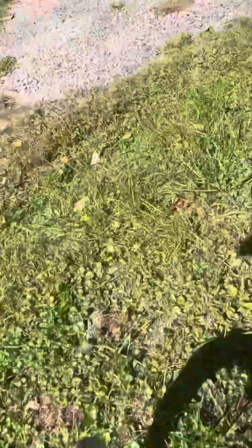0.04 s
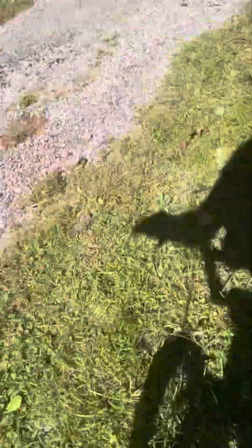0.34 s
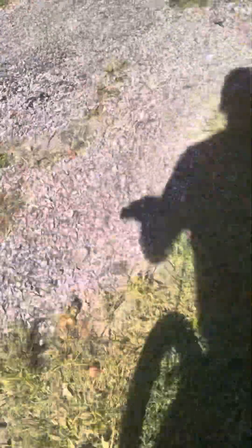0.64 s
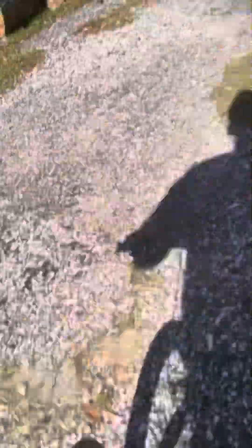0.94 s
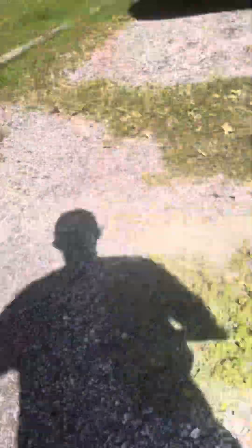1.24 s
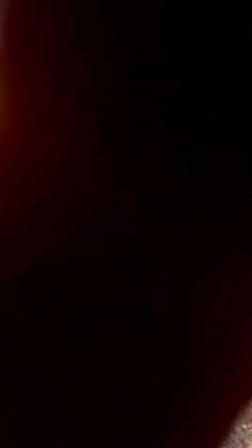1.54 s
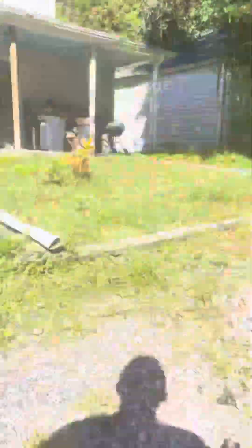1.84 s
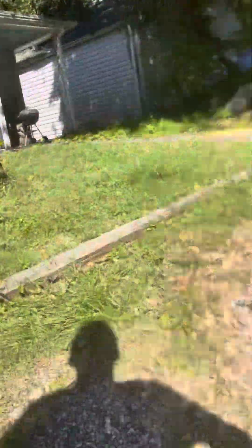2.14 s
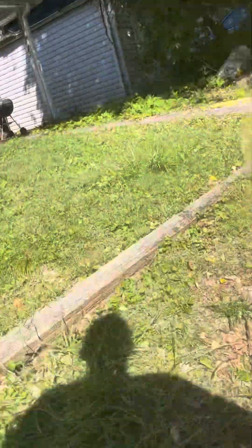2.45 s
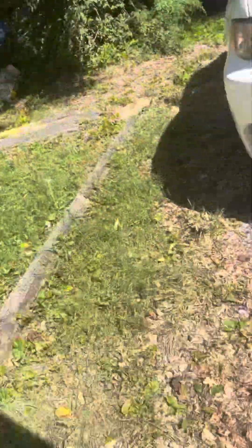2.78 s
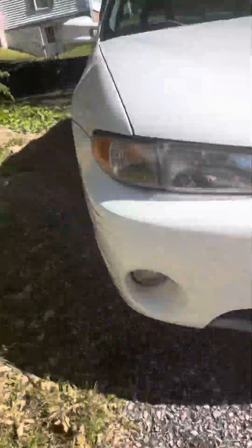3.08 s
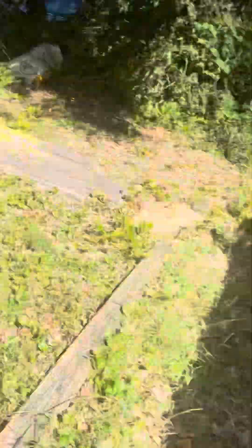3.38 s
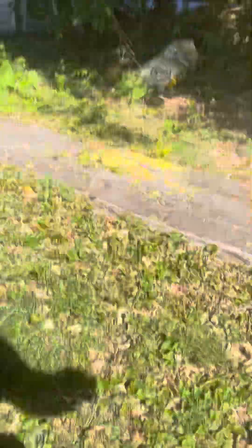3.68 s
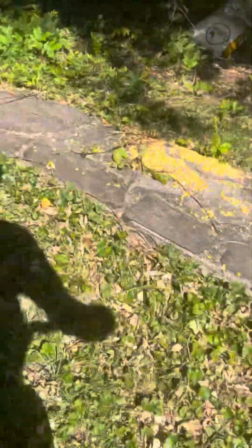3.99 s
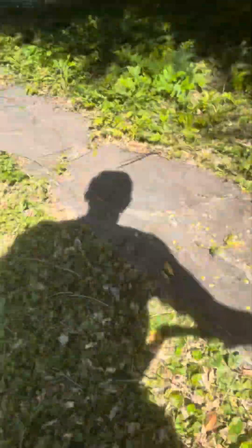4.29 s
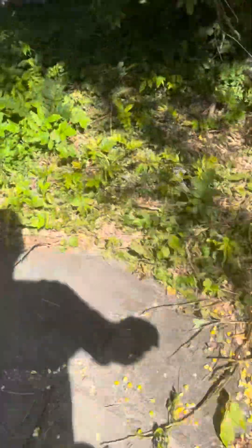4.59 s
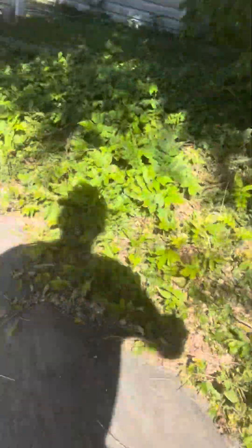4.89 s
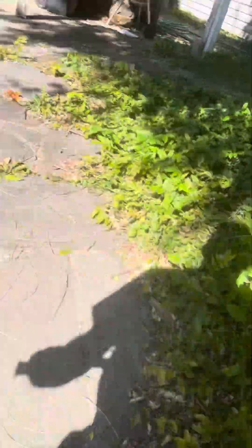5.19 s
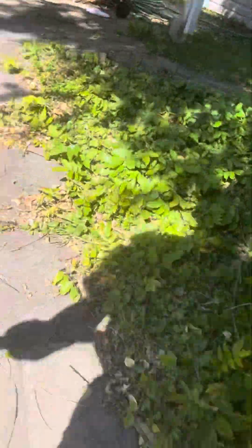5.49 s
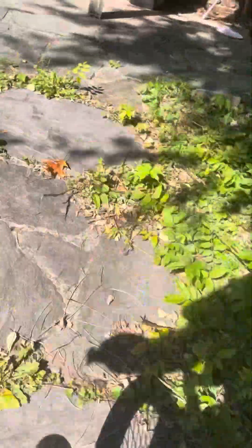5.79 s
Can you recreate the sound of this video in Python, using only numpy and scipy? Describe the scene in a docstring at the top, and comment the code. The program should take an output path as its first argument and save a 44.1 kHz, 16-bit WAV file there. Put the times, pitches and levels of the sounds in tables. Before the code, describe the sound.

A bicycle rolls over bumpy grass and gravel, rattling and knocking over low tyre rumble, with fingers rubbing near the microphone.

```python
"""On bumpy grass, gravel and dry leaves: a rolling bicycle, heard from a phone in the rider's hand.
The ground rustles under the wheels and the tyres rumble and thump. Fingers slip and tick near
the two microphone ports. Every jolt rattles loose parts, rings the frame and knocks the phone
in the grip; the case flexes and moves the left and right ports in opposite phase."""
import sys
import numpy as np
from scipy import signal
from scipy.fft import rfft, irfft, next_fast_len
from scipy.io import wavfile
from scipy.ndimage import uniform_filter1d

SR = 44100
rng = np.random.default_rng(int(sys.argv[2]) if len(sys.argv) > 2 else 0)


def store_pcm(level_fs):
    """Save levels as 16-bit WAV."""
    pcm = np.round(np.clip(level_fs, -1, 1) * 32767).astype(np.int16)
    wavfile.write(sys.argv[1], SR, np.atleast_2d(pcm).T)


N = 257095
T = np.arange(N) / SR


def undb(db):
    """Decibels to gain."""
    return 10 ** (np.asarray(db) / 20)


def unit(x):
    """Scale to rms 1."""
    return x / np.sqrt(np.mean(x ** 2))


def curves(table):
    """Table columns, interpolated linearly over time."""
    times, *columns = np.transpose(table)
    return [np.interp(T, times, column) for column in columns]


def add(track, start_s, sound):
    """Mix a sound into a track."""
    i = int(start_s * SR)
    part = sound[..., max(-i, 0):max(N - i, 0)]
    track[..., max(i, 0):max(i, 0) + part.shape[-1]] += part


def through(x, response):
    """Filter by a function of frequency."""
    size = next_fast_len(N + 4096)
    hz = np.arange(size // 2 + 1) * SR / size
    return irfft(rfft(x, size) * response(hz), size)[..., :N]


def gain_at(f, spectrum):
    """Gain of (Hz, dB) points, interpolated over log frequency."""
    hz, db = np.transpose(spectrum)
    return undb(np.interp(np.log(f + 1), np.log(hz), db))


def colour(x, spectrum):
    """Shape by a spectrum; white noise keeps its power."""
    return through(x, lambda f: unit(gain_at(f, spectrum)))


def walk(rate_hz):
    """Smooth random drift, rms 1."""
    hold = int(SR / rate_hz)
    steps = np.repeat(rng.standard_normal(N // hold + 1), hold)
    return unit(uniform_filter1d(uniform_filter1d(steps, hold), hold)[:N])


def grains(per_s, spread_db):
    """Three independent streams of tiny impacts, most weak, a few strong."""
    size = undb(spread_db * np.minimum(rng.exponential(size=(3, N)), 5))
    hits = rng.random((3, N)) < per_s / SR
    return unit(hits * size * rng.choice([-1, 1], (3, N)))


def swells(table):
    """Envelope of one Gaussian swell per row."""
    return sum(undb(db) * np.exp(-2 * ((T - mid_s) / length_s) ** 2) for mid_s, length_s, db in table)


def ping(t, hz, cycles):
    """A small hard part rings for a few cycles."""
    return np.sin(2 * np.pi * hz * t) * np.exp(-t * hz / cycles) * (1 - np.exp(-t * hz * 2))


def ring(t, hz, rise_s, sag=0.45):
    """A few cycles swell and die; the pitch sags through hz as the contact relaxes."""
    cycles = hz * (t - sag * t * t / (t + 4 * rise_s) / 2) * (1 + sag / 4)
    envelope = (t / rise_s * np.exp(1 - t / rise_s)) ** 2
    return envelope * np.sin(2 * np.pi * (cycles + rng.random()))


# Left port's lead over the right. Each row: frequency in Hz, phase in radians.
PORT_LEAD = [(0, 0), (200, 0), (450, 2.7), (1250, 3.3), (1750, 6.2), (3700, 6.8), (4800, 9.4), (5700, 12.2),
             (9100, 15.7), (11800, 18.6), (16000, 22.1)]
# Sound local to one port. Each row: frequency in Hz, gain in dB.
PORT_LOCAL = [(100, -30), (300, 11.5), (3500, -1), (5500, -2), (9000, -73), (14000, 16.5)]


def ports(streams):
    """Stream 0 reaches both ports, the left earlier; the other two reach one port each."""
    local = through(streams[1:], lambda f: gain_at(f, PORT_LOCAL))
    left = through(streams[0], lambda f: np.exp(1j * np.interp(f, *np.transpose(PORT_LEAD))))
    return np.array([left, streams[0]]) + local


def crackle(count=4500, low_hz=1400, high_hz=5200, spread_db=4.0, clump_db=9.5):
    """Stones and dry leaves snap in clumps, each at its own pitch."""
    t, out = np.arange(SR // 110) / SR, np.zeros((3, N))
    for when, pitch, size, *shares in rng.random((count, 6)):
        hz = low_hz * (high_hz / low_hz) ** pitch
        snap = undb(-spread_db * np.log(size + 0.033)) * ping(t, hz, cycles=0.88)
        add(out, when * N / SR, (np.array(shares)[:, None] - 0.5) * snap)
    return unit(out * undb(clump_db * np.tanh(walk(35))))


# Tyres on loose stones. Each row: centre in seconds, length in seconds, relative level in dB.
STONE_SCUFFS = [(.025, 0.033, -45), (.292, 0.014, -36.5), (.325, 0.02, -46), (.69, 0.037, -47),
                (.912, .008, -29), (.965, 0.0098, -36), (1.112, 0.011, -35), (1.161, 0.0082, -35),
                (1.372, 0.02, -45), (1.456, .005, -19), (1.627, 0.033, -41.5), (2.04, 0.064, -42.5),
                (2.165, 0.023, -30.5), (2.323, 0.0045, -34), (3.213, .011, -39.5), (3.757, 0.016, -40),
                (4.035, 0.015, -34), (4.452, 0.0077, -46)]


def scuffs(band_hz=(1500, 3200), gain_db=-2):
    """Loose stones grind together in short gritty bursts."""
    band = signal.butter(2, band_hz, "bandpass", fs=SR, output="sos")
    grit = unit(signal.sosfilt(band, grains(3500, spread_db=7.0)))
    return grit * swells(STONE_SCUFFS) * undb(gain_db)


# Grass and leaf rustle. Each row: time in seconds, relative level in dB.
RUSTLE_LEVELS = [(0.0, -43), (0.36, -49), (0.84, -47), (1.23, -56), (1.56, -47), (1.69, -55), (1.96, -61.5),
                 (2.19, -49), (2.77, -52.5), (3.34, -38.5), (3.51, -46), (3.67, -45), (4.27, -37.5),
                 (4.69, -39.5), (4.9, -50), (5.13, -54.5), (5.54, -44), (5.83, -48.5)]
# Brushing hiss and gravel crunch. Each row: frequency in Hz, relative level in dB.
HISS_SPECTRUM = [(800, -20.5), (2500, 2.5), (4300, 4.5), (6500, 6.5), (8200, 1), (9500, 2.5), (10900, 8),
                 (12800, -19.5), (14700, -33.5), (15600, -51)]
CRUNCH_SPECTRUM = [(500, 4.5), (1100, 8), (2400, -10), (3300, -7), (4500, 7), (15000, -127)]


def rustle(crunch_db, hiss_gain_db=-4, stones_top_hz=8000):
    """Blades brush, leaves crackle and gravel crunches under the wheels, in uneven surges."""
    hiss_db, = curves(RUSTLE_LEVELS)
    flutter_db = 2.5 * walk(55)
    blades = grains(16000, spread_db=3.5)
    leaves = undb(-7) * grains(250, spread_db=10)
    surge_db = 0.6 * walk(100) - 1.5 * walk(6.2)
    hiss = colour(blades + leaves, HISS_SPECTRUM) * undb(hiss_db + hiss_gain_db + flutter_db + surge_db)
    gravel = colour(rng.standard_normal((3, N)), CRUNCH_SPECTRUM)
    crunch = undb(-4) * gravel + undb(-3) * crackle()
    stones = scuffs() + crunch * undb(crunch_db + flutter_db)
    lowpass = signal.butter(6, stones_top_hz, "lowpass", fs=SR, output="sos")
    return ports(hiss + signal.sosfilt(lowpass, stones))


# Tyre rumble. Each row: frequency in Hz, relative level in dB.
RUMBLE_SPECTRUM = [(20, -28), (42, -3), (68, 1.5), (115, -2.5), (165, -16), (250, -14.5), (500, -26.5),
                   (6000, -62), (16000, -110)]


def tyres(level_db, gain_db=6.0, lumps_db=4.5, side_db=-24):
    """Tufts and stones shake the tyres into a lumpy rumble, nearly equal at both ports."""
    mid, side = unit(colour(rng.standard_normal((2, N)), RUMBLE_SPECTRUM))
    rumble = mid + undb(side_db) * np.array([side, -side])
    return rumble * undb(level_db + gain_db + lumps_db * np.tanh(walk(18)))


# Ticks at the ports. Each row: start in seconds, relative level in dB.
FINGER_TICKS = [(0.915, -6), (0.925, -16), (1.196, -19), (1.429, -25), (1.4586, -4.5), (1.5, -13.5),
                (1.6638, -9), (1.954, -15.5), (2.179, -16.5), (3.6999, -8.5), (4.7939, -14.5), (4.816, -18)]
# Slips on the case. Each row: centre in seconds, length in seconds, relative level in dB.
FINGER_SLIPS = [(0.882, 0.0064, -25), (0.955, 0.007, -28), (1.454, 0.0025, -21), (1.63, 0.023, -36),
                (2.87, 0.12, -44), (3.163, 0.02, -32.5), (3.212, 0.037, -32.5), (4.07, 0.076, -38),
                (4.261, 0.012, -29.5), (4.444, 0.036, -25.5), (4.63, 0.09, -35), (5.61, 0.091, -37)]


def fingers(slip_db=-2, tick_db=-4, tick_decay_s=0.00076):
    """Skin slips on the case in dense runs of catches, and gives single dry ticks."""
    t, envelope = np.arange(SR // 50) / SR, np.zeros(N)
    for start_s, db in FINGER_TICKS:
        add(envelope, start_s + 0.00013, undb(db + tick_db) * np.exp(-t / tick_decay_s))
    tick_spectrum = [(800, 17.5), (3000, 14.0), (6000, 20.5), (11000, 18.0), (15000, -22)]
    ticks = colour(rng.standard_normal((3, N)) * envelope, tick_spectrum)
    catches = grains(9000, spread_db=4.5) * swells(FINGER_SLIPS) * undb(slip_db)
    return ports(colour(catches, HISS_SPECTRUM) + ticks)


def case_flex(mid, side, flex_db, low_hz=210):
    """The case bends only above the bass and moves the ports in opposite phase."""
    highpass = signal.butter(2, low_hz, "highpass", fs=SR, output="sos")
    bend = signal.sosfilt(highpass, side) * undb(flex_db)
    return np.array([mid + bend, mid - bend])


# Phone and handlebar modes. Each row: frequency in Hz, decay in seconds, relative level in dB.
BODY_MODES = [(246.2, 0.014, 3), (334, 0.02, -9.5), (483, 0.011, -6), (631.6, 0.0074, 0.5),
              (900, 0.0019, -8), (1303, 0.0027, -7.5)]


def body(t, contact_s=0.00042):
    """One soft blow on phone and handlebar; each lands on another spot, so the modes vary."""
    hz, decay_s, db = np.transpose(BODY_MODES)[:, :, None]
    weight, detune = rng.standard_normal((2, len(BODY_MODES), 1))
    tones = np.sin(2 * np.pi * hz * (1 + 0.08 * detune) * t)
    modes = undb(db) * unit(weight) * np.exp(-t / decay_s) * tones
    return modes.sum(axis=0) * (1 - np.exp(-t / contact_s))


def rattles(level_db, flex_db, count=170, gap_s=0.051, spread_db=8.0, bounce_s=0.00883, bounce_db=-9):
    """Loose parts chatter unevenly on the rough ground; each hit bounces once."""
    t, out, start_s = np.arange(SR // 25) / SR, np.zeros((2, N)), 0
    for jitter, size, lag in rng.uniform(-1, 1, (count, 3)):
        start_s += gap_s * (1 + 0.45 * jitter)
        for delay_s, db in (0, 0), (bounce_s * (1 + lag / 2), bounce_db):
            add(out, start_s + delay_s, undb(spread_db * size + db) * np.array([body(t), body(t)]))
    mid, side = unit(out) * undb(level_db - 1)
    return case_flex(mid, side, flex_db - 1)


# Chain and cable hits. Each row: start in seconds, relative level in dB.
CHAIN_CLINKS = [(0.1406, -17), (0.316, -14), (0.416, -10), (0.581, -15), (0.6165, -9.5), (0.845, -12),
                (0.868, -8), (0.956, -7.5), (1.007, -19), (1.1443, -16), (1.379, -19), (1.451, -12),
                (1.6176, -11), (2.2956, -17), (2.3805, -17.5), (2.4802, -24), (2.6414, -28),
                (2.7273, -22.5), (3.111, -26), (3.231, -20), (3.518, -16), (3.7081, -10), (3.753, -20),
                (3.8531, -18), (3.956, -18), (4.0554, -17), (4.154, -14.5), (4.4532, -22), (4.687, -20.5),
                (5.159, -17.5)]


def clinks(pitch_hz=1170, scatter=0.18, cycles=1.6, again_s=0.0038, again_db=-4):
    """Chain and cables tap the frame twice, short and woody, bending the case more than moving it."""
    t, out = np.arange(SR // 50) / SR, np.zeros((2, N))
    for start_s, db in CHAIN_CLINKS:
        first_hz, second_hz = pitch_hz * (1 + scatter * rng.standard_normal((2, 2, 1)))
        add(out, start_s, undb(db) * rng.choice([-1, 1], (2, 1)) * ping(t, first_hz, cycles))
        second_s = start_s + again_s * (0.5 + rng.random())
        add(out, second_s, undb(db + again_db) * ping(t, second_hz, cycles))
    mid, side = out
    return undb(-5) * mid + undb(-3) * np.array([side, -side])


# Hard bumps. Each row: start in seconds, clack level in dB, thump level in dB, nominal thump pitch in Hz.
HARD_BUMPS = [(0.21, -6.5, -7.5, 72.4), (.910, -7, -9, 96), (.978, -1, -5.5, 71), (1.02, -33, -7.5, 108),
              (1.193, -11, -16.5, 99), (1.458, 2.5, -1.5, 193.5), (2.146, -11.5, -8, 75),
              (3.708, -18, -14, 97), (3.78, -16, -10.5, 80.5), (4.302, -43, -11.5, 122),
              (4.52, -41, -21.5, 102)]


def thumps(lag_s=0.0018, rise_cycles=0.96):
    """The wheels drop into hollows and shove both ports alike, just after the clack."""
    t, out = np.arange(SR // 6) / SR, np.zeros(N)
    for start_s, _, db, hz in HARD_BUMPS:
        add(out, start_s + lag_s, undb(db) * ring(t, hz, rise_cycles / hz, sag=0.65))
    return out


def clacks(pitch_hz=910, scatter=0.13, overtone_ratio=1.54, overtone_db=-5):
    """Hard parts clack together at each bump, pitched a little differently at each port."""
    t, out = np.arange(SR // 40) / SR, np.zeros((2, N))
    for start_s, db, _, _ in HARD_BUMPS:
        hz = pitch_hz * (1 + scatter * rng.standard_normal((2, 1)))
        overtone = undb(overtone_db) * ping(t, overtone_ratio * hz, cycles=1.82)
        add(out, start_s, undb(db) * (ping(t, hz, cycles=1.94) + overtone))
    return out


# Frame tube modes. Each row: frequency in Hz, decay in seconds, relative level in dB.
TUBE_MODES = [(465.4, 0.017, -16.5), (1250, 0.0077, -24)]


def frame(flex_db, hollow_db=-3):
    """Each knock rings the tubes, more in a firm grip; only the lower mode moves the whole phone."""
    t, out = np.arange(SR // 12) / SR, np.zeros((2, N))
    hz, decay_s, db = np.transpose(TUBE_MODES)[:, :, None]
    envelope = np.exp(-t / decay_s) * (1 - np.exp(-t * hz))
    for start_s, knock_db, _ in GRIP_KNOCKS:
        cycles = hz * t + rng.random((2, len(TUBE_MODES), 1))
        mid, side = undb(knock_db + db) * envelope * np.sin(2 * np.pi * cycles)
        add(out, start_s, undb(hollow_db) * mid[0] + np.outer([1, -1], sum(side)))
    return out * undb(0.96 * flex_db)


# Frame against grip. Each row: time in seconds, relative level in dB, nominal pitch in Hz.
GRIP_KNOCKS = [(0.017, -21.5, 420), (0.144, -9.5, 453), (0.193, -8.5, 505), (0.332, -17.5, 433),
               (0.375, -17, 380), (0.435, -24, 458), (0.492, -22.5, 304), (0.585, -13, 432),
               (0.62, -21, 376), (0.661, -21.5, 312), (0.858, -12.5, 285), (0.906, -11.5, 432),
               (0.916, -7.5, 452), (0.958, -12.5, 470), (0.969, -12, 553), (0.977, -13, 483),
               (1.018, -11, 364), (1.199, -7.5, 474), (1.238, -12.5, 423), (1.388, -13, 396),
               (1.464, -7, 461), (1.626, -22, 557), (1.893, -25, 510), (2.142, -12.5, 367),
               (2.179, -9, 400), (2.341, -21, 360), (2.399, -17.5, 367), (2.439, -21.5, 405),
               (2.503, -20.5, 410), (2.531, -18.5, 466), (2.697, -23.5, 334), (2.788, -29.5, 348),
               (2.902, -22, 440), (2.992, -25, 410), (3.37, -19, 464), (3.537, -18, 443),
               (3.587, -22.5, 323), (3.711, -7, 432), (3.759, -6, 485), (3.784, -16, 604),
               (3.815, -16.5, 446), (3.921, -22.5, 390), (4.011, -12.5, 454), (4.075, -12, 502),
               (4.119, -12.5, 420), (4.286, -20, 500), (4.309, -12.5, 390), (4.361, -17, 494),
               (4.399, -11, 444), (4.459, -21.5, 510), (4.515, -25, 434), (4.737, -18, 418),
               (4.777, -16, 517), (4.802, -19.5, 420), (4.847, -20.5, 440), (4.943, -28, 450),
               (5.185, -23, 507), (5.235, -21.5, 445), (5.488, -18.5, 424), (5.631, -24.5, 517)]
# Scrape of a knock. Each row: frequency in Hz, relative level in dB.
GRIT_SPECTRUM = [(300, 21.5), (1000, 13.5), (2200, -1), (4200, 11), (6500, 0.5), (9000, -10), (11000, -6.5),
                 (15000, -66)]


def knocks(flex_db, rise_s=0.00326, bounce_s=0.00792, crack_s=0.0062, scrape_s=0.016, lead_s=0.0047):
    """Each knock scrapes, cracks, then rings briefly, shoving the phone and bending its case."""
    t = np.arange(SR // 14) / SR
    mid, side, grit_envelope = np.zeros((3, N))
    from_peak_s = np.abs(t - t.mean())
    crack = np.exp(-from_peak_s / crack_s) + undb(-9) * np.exp(-from_peak_s / scrape_s)
    for at_s, db, hz in GRIP_KNOCKS:
        add(grit_envelope, at_s - lead_s - t.mean(), undb(db - 19) * crack)
        add(mid, at_s - rise_s / 2, undb(db - 1) * ring(t, hz * 0.6, rise_s=0.0038))  # shove
        add(mid, at_s - rise_s, undb(db - 2) * ring(t, hz * 1.127, rise_s))  # hollow ring
        add(side, at_s - rise_s, undb(db + 1) * ring(t, hz, rise_s))  # case bends
        add(mid, at_s, undb(db - 12) * ring(t, hz * 0.324, rise_s=0.008, sag=0.62))  # hand gives way
        for track in (mid, side):
            add(track, at_s, undb(db - 11) * body(t))
            rebound_s = at_s + bounce_s * (0.614 + 0.798 * rng.random())
            add(track, rebound_s, undb(db - 8) * ring(t, hz, rise_s))
    grit = colour(grains(5500, spread_db=6.0), GRIT_SPECTRUM) * grit_envelope
    return case_flex(mid, side, flex_db) * undb(-flex_db / 2) + ports(grit)


# Ground roughness. Each row: time in seconds, then relative rumble, rattle and crunch levels in dB.
ROLLING_LEVELS = [(0.0, -41, -35.5, -55), (0.29, -34.5, -31.5, -49), (0.68, -43, -37, -55),
                  (1.38, -29.5, -30, -48.5), (1.82, -38, -41, -51), (2.11, -44, -36, -46.5),
                  (2.48, -34.5, -31, -49.5), (2.95, -43.5, -45.5, -53.5), (3.23, -40.5, -39.5, -54.5),
                  (3.72, -36, -38, -50), (4.22, -41.5, -40.5, -54.5), (4.45, -36.5, -34, -55.5),
                  (4.97, -44.5, -49.5, -57.5), (5.35, -43, -51.5, -55), (5.83, -48, -47.5, -53)]
# Grip on the phone. Each row: time in seconds, case flex in dB, left minus right in dB.
GRIP = [(0, -1, 0.8), (1.2, 1, -0.5), (2.5, -1.5, 2.5), (3.6, 5.5, -2), (5.83, 6.5, -1)]


def scene():
    """All sources at the two ports; the grip pans the clatter."""
    rumble_db, rattle_db, crunch_db = curves(ROLLING_LEVELS)
    flex_db, pan_db = curves(GRIP)
    clatter = knocks(flex_db) + frame(flex_db) + clacks() + clinks() + rattles(rattle_db, flex_db)
    pan = undb(np.array([pan_db, -pan_db]) / 2)
    return tyres(rumble_db) + thumps() + clatter * pan + rustle(crunch_db) + fingers()


def record(dry):
    """The phone rounds the loudest peaks and cuts the top."""
    ceiling, top_hz = 0.95, 16400
    rounded = dry / (1 + (dry / ceiling) ** 4) ** 0.25
    return signal.sosfilt(signal.ellip(8, 0.2, 80, top_hz, fs=SR, output="sos"), rounded)


dry = scene()
out = record(dry)
store_pcm(out)
```